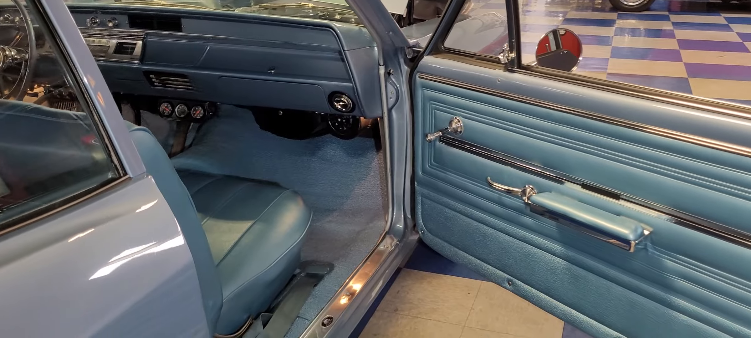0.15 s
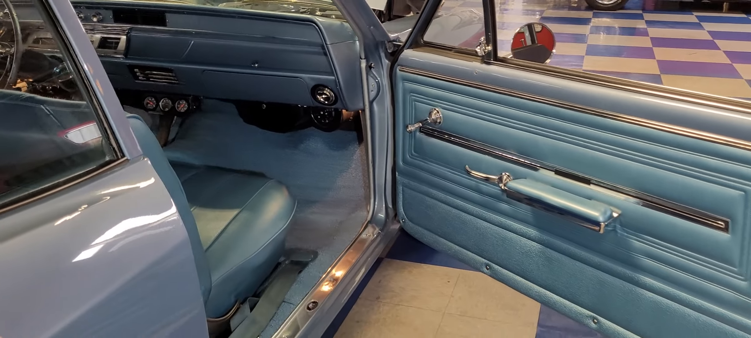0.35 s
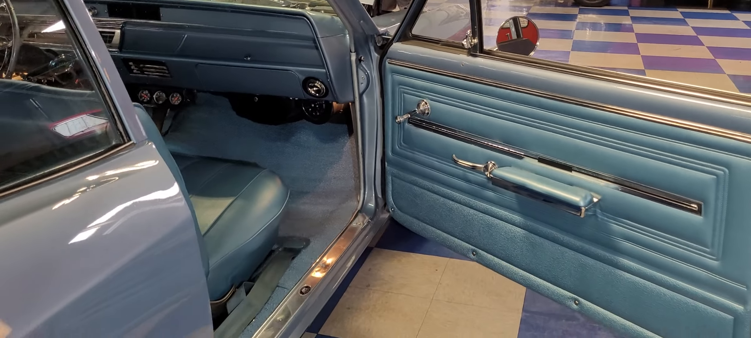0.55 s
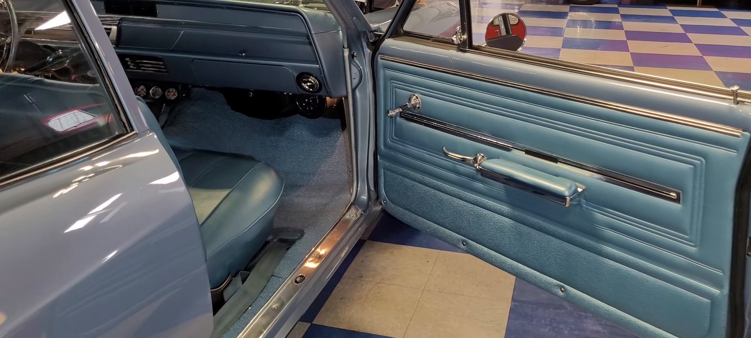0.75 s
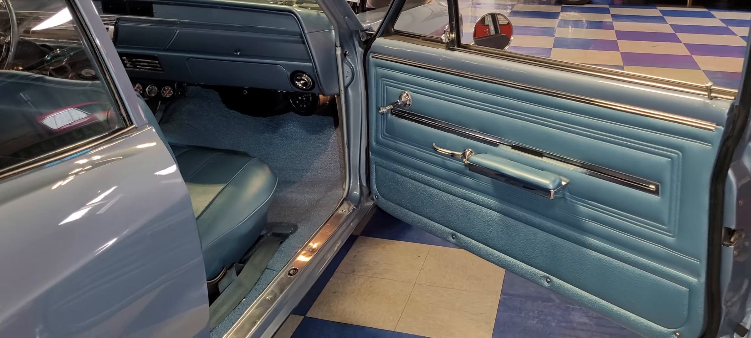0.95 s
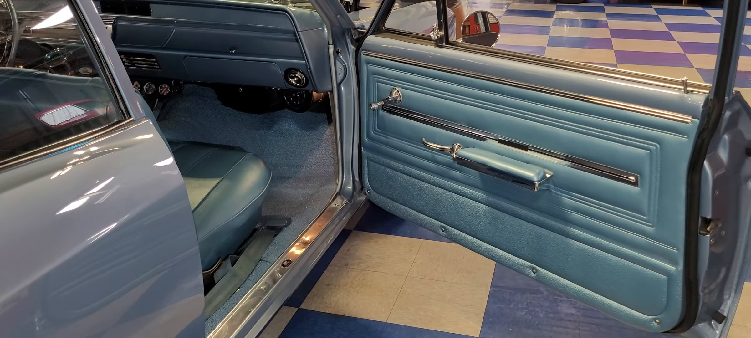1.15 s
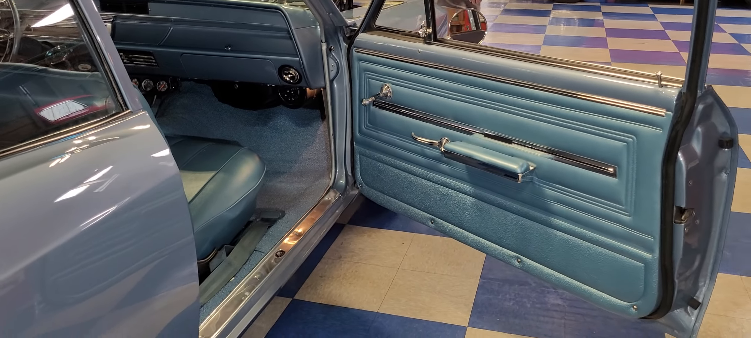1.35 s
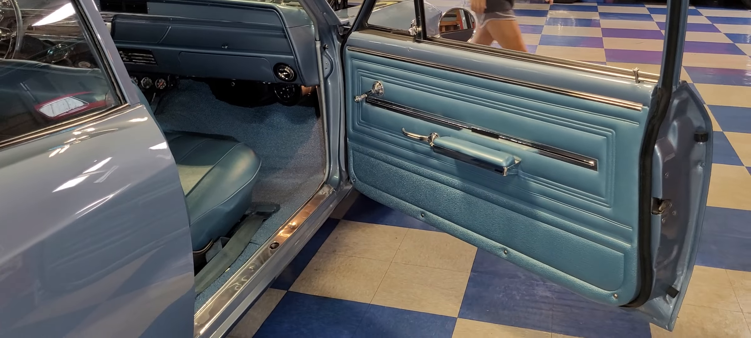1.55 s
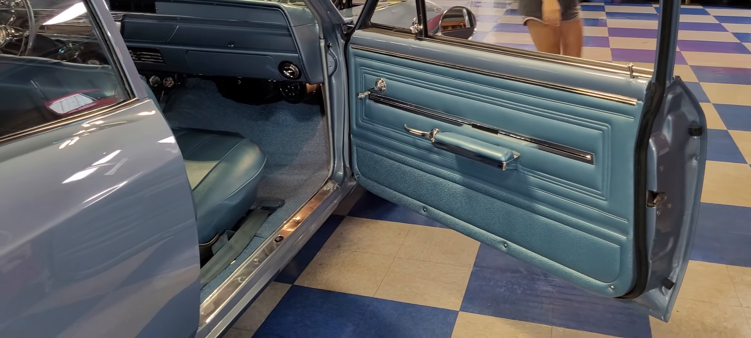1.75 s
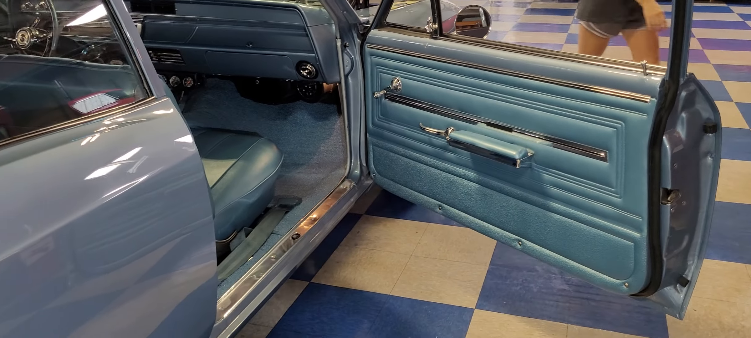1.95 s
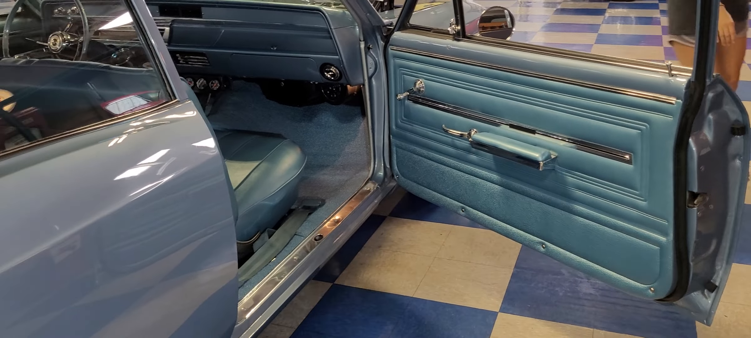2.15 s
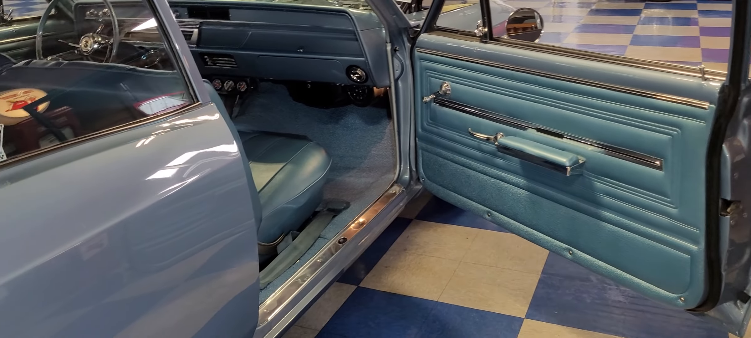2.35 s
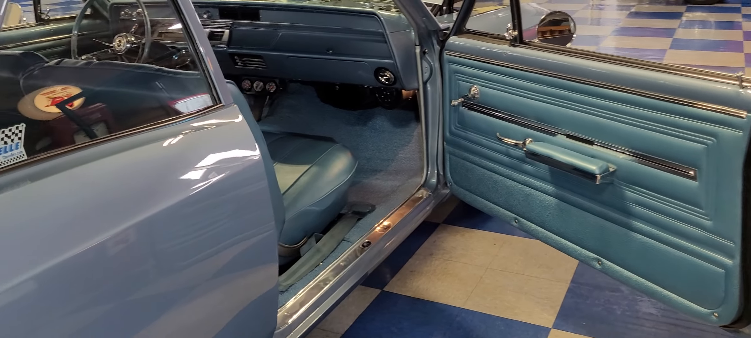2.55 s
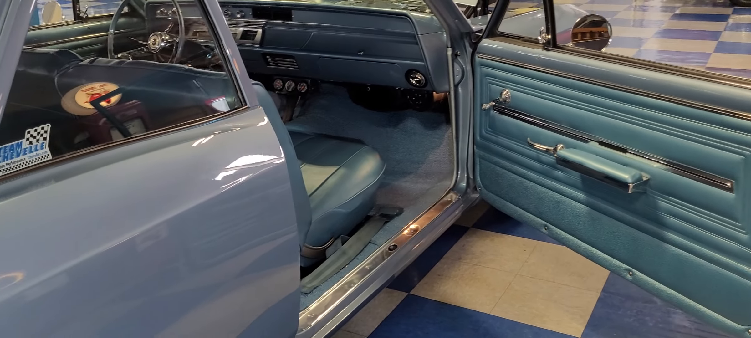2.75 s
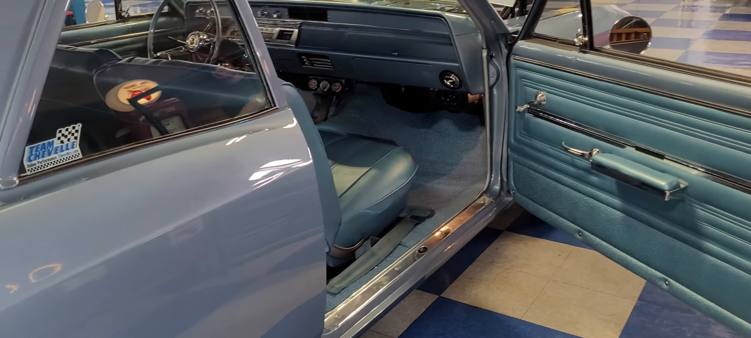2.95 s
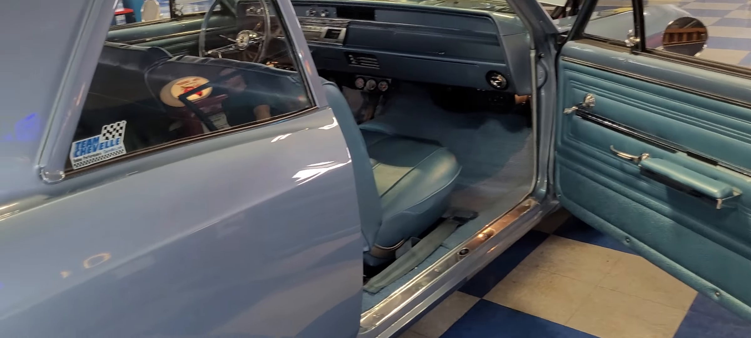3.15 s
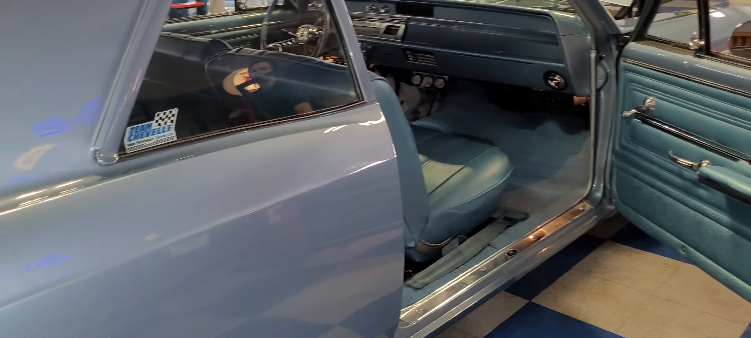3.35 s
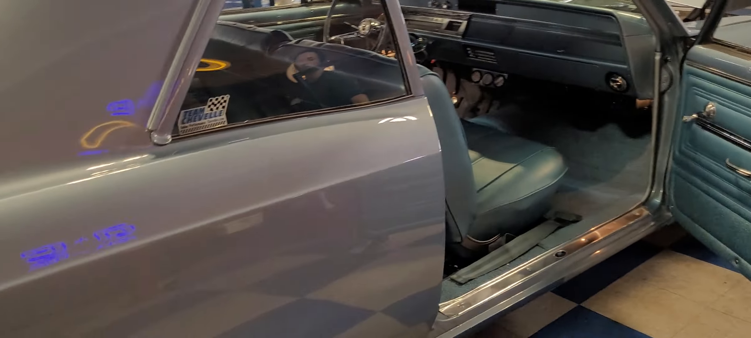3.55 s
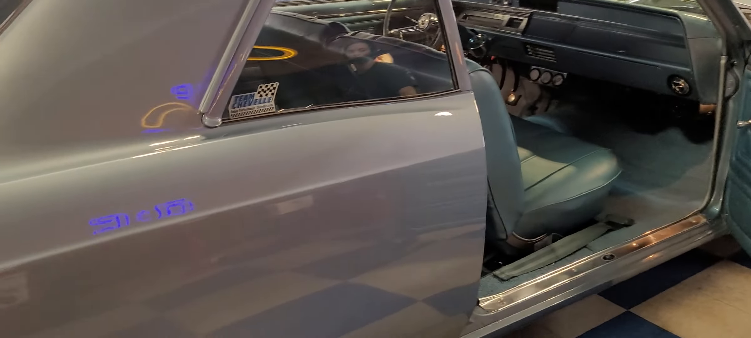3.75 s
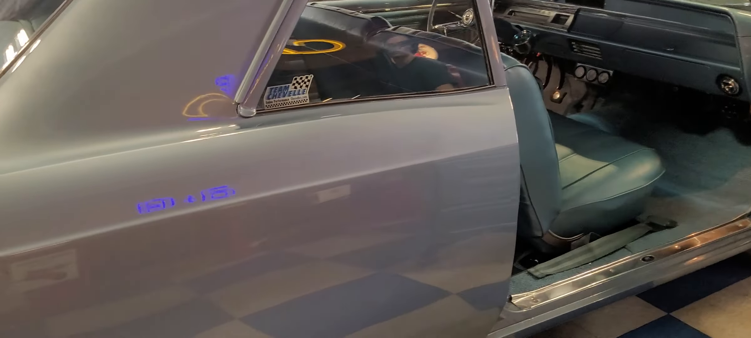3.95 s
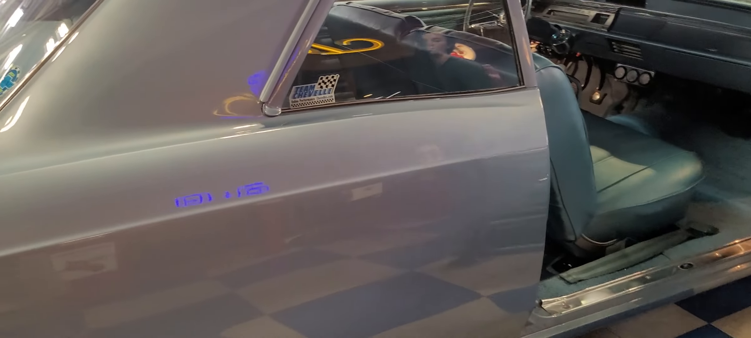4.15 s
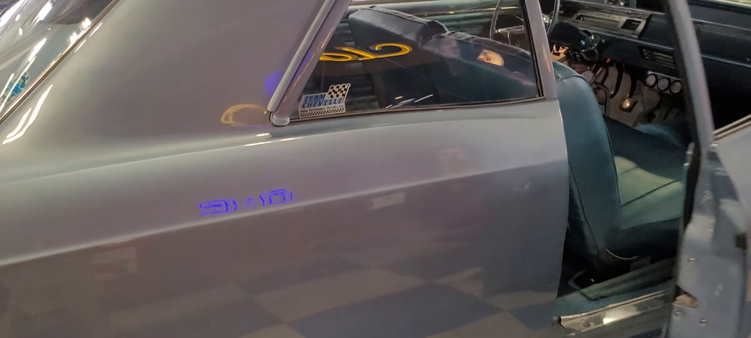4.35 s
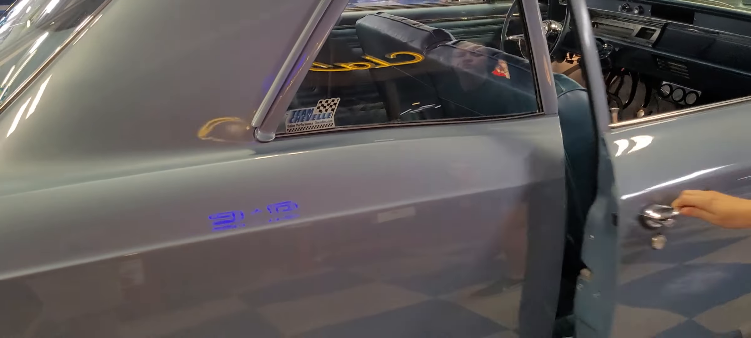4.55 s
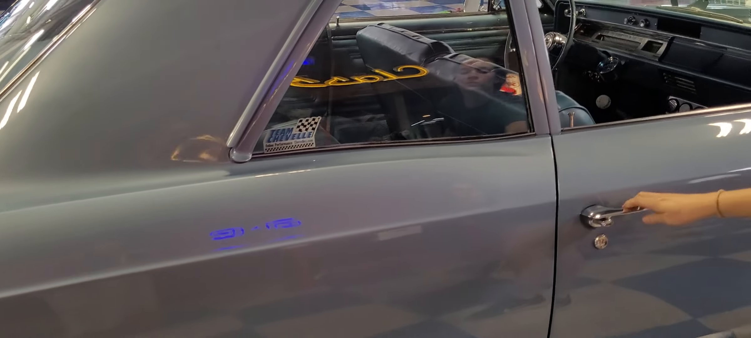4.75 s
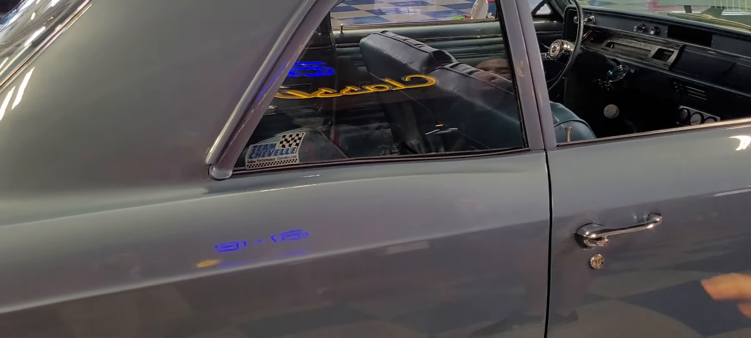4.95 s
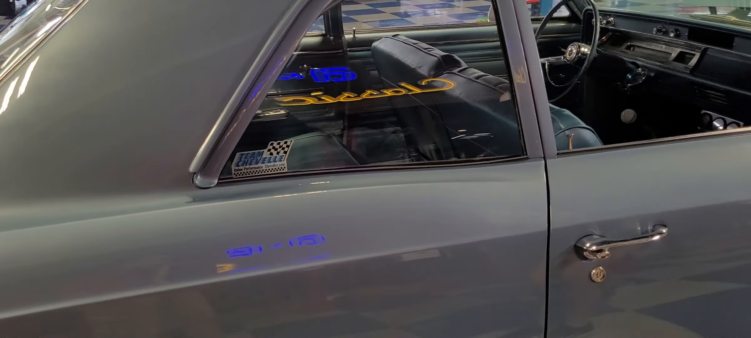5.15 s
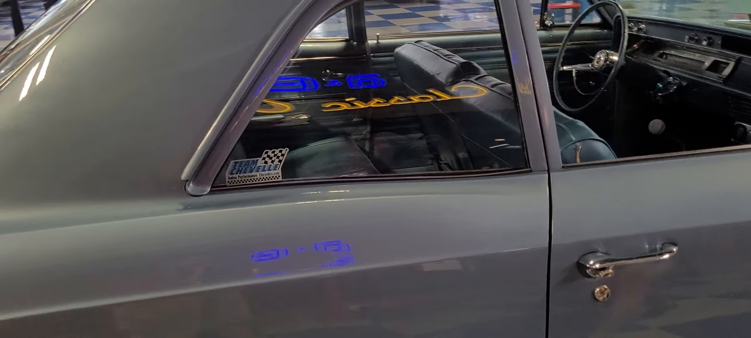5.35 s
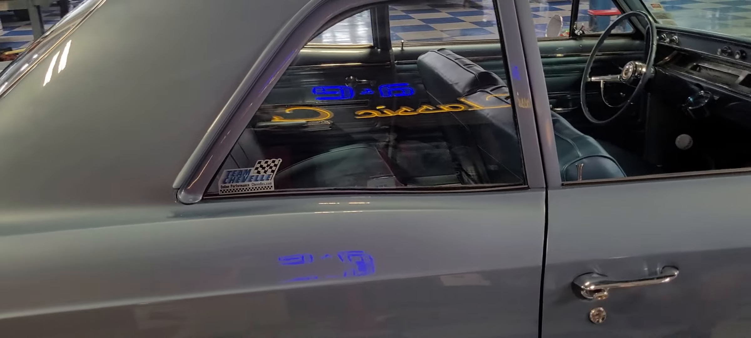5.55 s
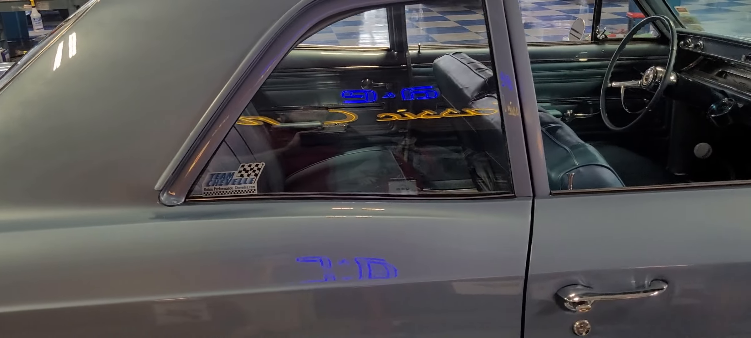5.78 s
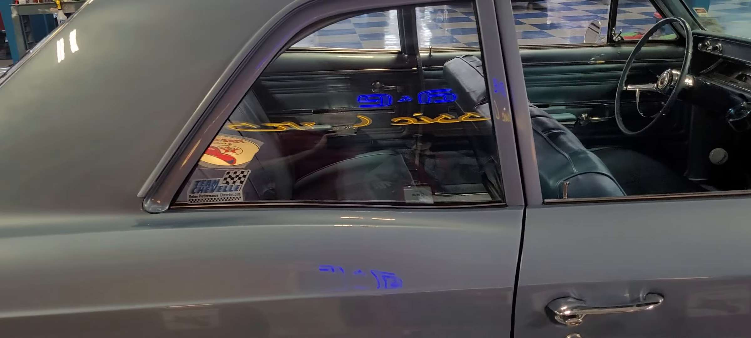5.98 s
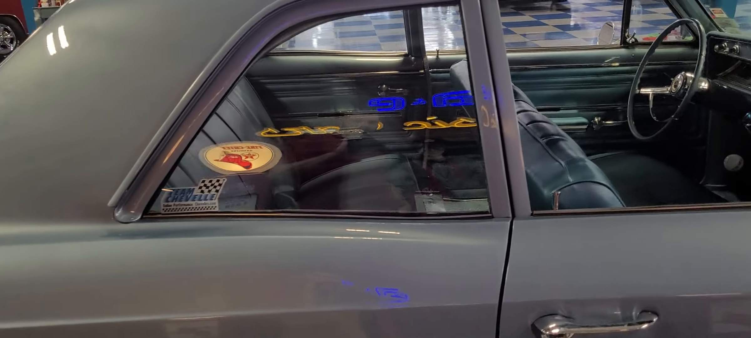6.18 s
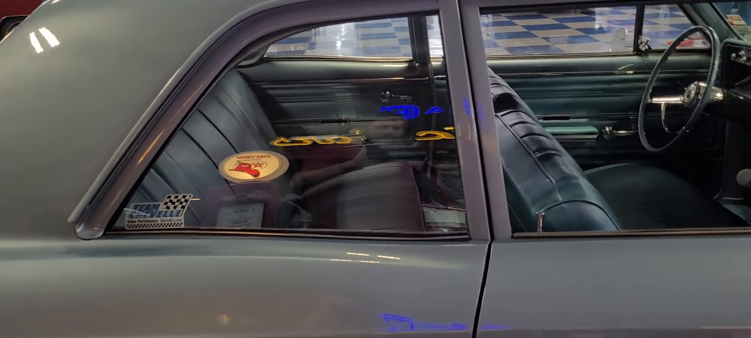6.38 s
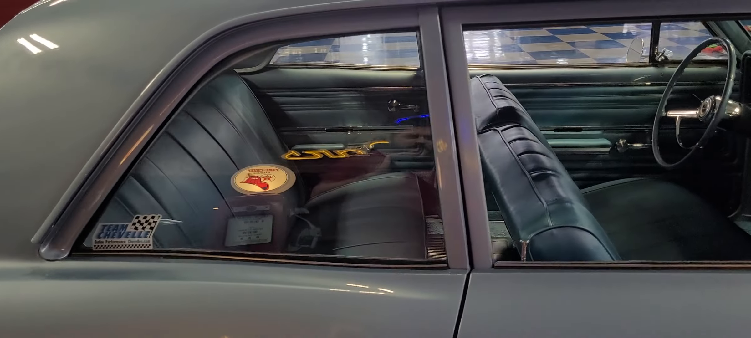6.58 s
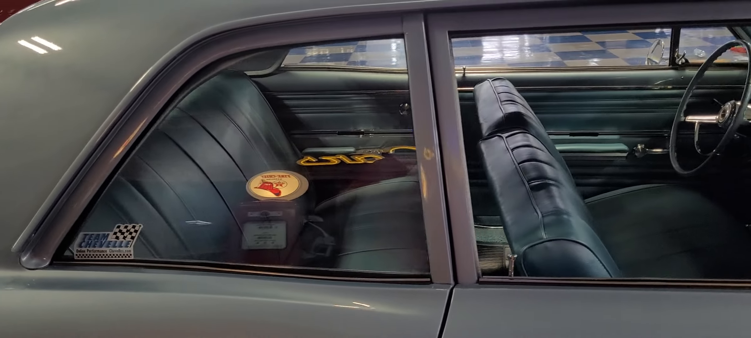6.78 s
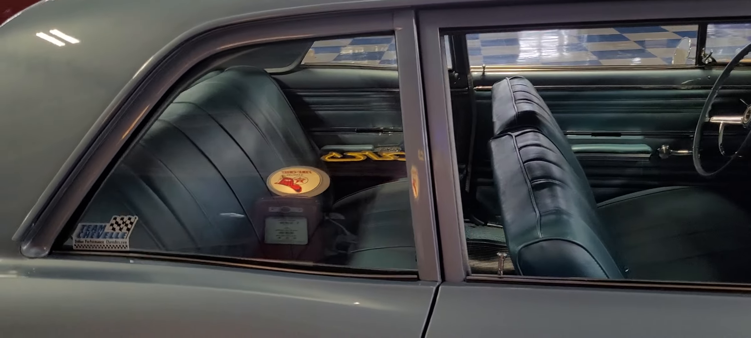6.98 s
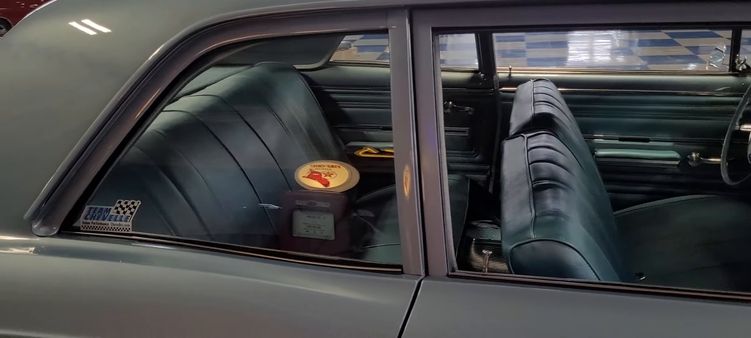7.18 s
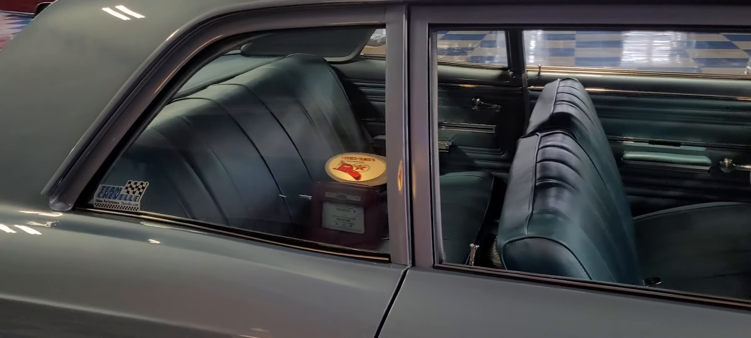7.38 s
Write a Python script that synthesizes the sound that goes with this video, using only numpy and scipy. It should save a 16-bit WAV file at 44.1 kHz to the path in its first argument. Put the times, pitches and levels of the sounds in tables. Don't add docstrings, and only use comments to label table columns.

```python
import sys
import numpy as np
from scipy import signal
from scipy.fft import rfft, irfft, next_fast_len
from scipy.io import wavfile
from scipy.ndimage import map_coordinates

SR = 44100
rng = np.random.default_rng(int(sys.argv[2]) if len(sys.argv) > 2 else 0)


def how_loud(loudness_db):
    steps = np.asarray(loudness_db, float) / 20
    return 10 ** steps


def store_pcm(level_fs):
    pcm = np.round(np.clip(level_fs, -1, 1) * 32767).astype(np.int16)
    wavfile.write(sys.argv[1], SR, np.atleast_2d(pcm).T)


N = 327129

# frequency_hz, density_db
RUMBLE_SPECTRUM = [(15, -49), (25, -26.5), (46, -6.5), (70, 0), (85, -2.5), (100, -9), (140, -11),
                   (170, -15.5), (220, -44), (370, -120)]
# frequency_hz, density_db
RUSH_SPECTRUM = [(100, -15.5), (170, -1), (194, -7.5), (248, -3), (282, -6.5), (317, -7), (398, -17.5),
                 (552, -15.5), (1080, -28), (2450, -31.5), (4640, -36), (6440, -35.5), (8500, -55),
                 (11000, -81), (18700, -120)]
# frequency_hz, density_db
HISS_SPECTRUM = [(4940, -64), (8000, -38), (8700, -33), (11800, -13.5), (13800, -14.5), (14400, -9),
                 (15000, 1), (15300, -5.5), (15740, -7.5), (15800, -35.5)]
# centre_hz, width_hz
DUCT_RESONANCES = [
    (543, 5),
    (2550, 200),
    (694, 5),
    (480, 6),
]
# frequency_hz, likeness (-1 to 1)
DIFFUSE_LIKENESS = [(60, 0.91), (180, 0.98), (550, 0.54), (1650, -0.3), (4970, 0.0056), (15000, -0.087)]
# frequency_hz, left_minus_right_db
BACKGROUND_BALANCE = [(60, -1.5), (180, -0.5), (550, -3.0), (1650, -4), (4970, 0.5), (15000, 5.5)]
# time_s, level_db
FLOW_LEVEL = [(0.0, -1.5), (0.39, 0.5), (.85, -0.5), (1.05, -4), (1.4, 2), (1.9, -0.5), (2.3, -0.5),
              (2.75, 1), (3.0, 1), (3.5, 3.5), (3.7, -2.5), (4.17, 3), (4.55, 0.5), (4.87, 8), (5.23, -1.5),
              (6.49, 0), (7.17, 1), (7.42, 5.5)]
# centre_s, half_width_s, level_db
DUCT_BEAMS = [(1.9, 0.64, -61.5), (3.0, 0.97, -73), (4.3, 0.51, -59.5), (7.4, 0.6, -61)]
# time_s, level_db
FAR_FAN_LEVEL = [(0, -75), (5.9, -72), (6.5, -53.5), (7.0, -52.5), (7.42, -49.5)]
# centre_hz, width_hz, level_db
FAR_FAN_TONES = [(228, 40, -0.5), (324, 60, -0.5)]
# frequency_hz, rms_db
BALLAST_LINES = [(14783, -81), (14847, -78), (14906, -81), (14966, -79), (15014, -79), (15084, -80),
                 (15149, -80), (15563, -88)]
# frequency_hz, t60_s
HALL_DECAY = [(60, 1.2), (250, 1.1), (800, 0.65), (3000, 1.33), (6000, 1.27), (9000, 1.24), (12000, 0.74)]
# frequency_hz, level_db
HALL_COLOUR = [(40, -8), (120, -8), (250, -5), (1000, -3.5), (5000, 2), (9000, -4), (15000, -2)]
# frequency_hz, level_db
PORT_RESPONSE = [(1500, 3.5), (3000, -1.5), (5800, 1.5), (7300, -1.5), (8500, -25), (10000, -10),
                 (12000, -6), (15000, -4), (16500, -7)]
# frequency_hz, likeness (-1 to 1)
NEAR_LIKENESS = [(60, 0.93), (180, 1), (550, 0.85), (1650, 0.077), (4970, 0.0034), (15000, 0.08)]
# frequency_hz, likeness (-1 to 1)
SNAP_LIKENESS = [(500, 0.46), (5000, 0.6), (15000, 0.28)]
# frequency_hz, left_minus_right_db
BODY_SHADOW = [(60, -3.5), (150, -0.5), (380, -2.5), (950, -1.5), (2380, 1), (5980, 6.5), (15000, 11.5)]
# peak_s, length_s, level_db, contact (0 instep, 1 heel, 2 toe)
SOLE_DRAGS = [(.406, 0.11, -55.5, 0.26), (1.1, 0.086, -61, 0.42), (1.19, 0.11, -63.5, 1),
              (1.67, 0.21, -59.5, .6), (2.29, 0.13, -69, 2), (2.51, 0.15, -56, 0.49), (2.77, 0.2, -59, .2),
              (2.9, 0.12, -74, 0.18), (3.116, 0.089, -60, 1.6), (3.29, 0.087, -76, .5),
              (3.89, 0.065, -58, 1), (1.47, .1, -64, .3), (4.17, 0.14, -55.5, .4), (4.256, 0.12, -55, 1.45),
              (4.44, 0.13, -56.5, 0.11), (5.32, .2, -60.5, 0.85), (5.61, 0.13, -64, 2),
              (5.94, 0.1, -51.5, 1.2), (6.3, 0.3, -61, 1.1), (6.534, 0.11, -58, 0.12),
              (6.66, 0.16, -57, 1.5), (6.97, 0.07, -56, 0.37), (7.17, 0.19, -54.5, 0.45),
              (7.27, 0.16, -50.5, 0.42), (7.39, 0.18, -59.5, 1.2)]
# peak_s, length_s, level_db, contact (0
SOLE_SCUFFS = [(3.023, 0.076, -56.5, 0.23), (3.542, 0.0087, -43.5, 1.6), (3.572, 0.17, -54, 0.66),
               (3.668, 0.071, -48.5, 0.56), (4.033, 0.11, -52.5, 1.8), (4.1, 0.056, -47.5, 0.093),
               (6.19, .05, -61.5, 2), (6.472, 0.038, -51.5, 1.64), (6.745, 0.081, -54.5, 1.7),
               (6.885, 0.14, -49, 1.55)]
# peak_s, length_s,
# level_db
CLOTH_RUBS = [(0.364, 0.043, -77), (2.3, .1, -72), (2.458, 0.21, -67.5), (2.825, 0.23, -66),
              (3.09, 0.21, -66), (3.266, 0.13, -68), (3.543, 0.011, -49), (3.586, 0.043, -64),
              (4.036, .02, -56), (4.086, 0.12, -59), (4.237, 0.16, -60.5), (5.607, .06, -76),
              (5.937, .16, -66.5), (6.465, 0.14, -57), (6.71, 0.13, -67), (6.91, .2, -73),
              (7.264, 0.83, -69.5)]
# centre_hz, width_hz, level_db
RUBBED_PARTS = [
    [(730, 650, 2.5), (1500, 610, -5)],
    [(2430, 1430, 0)],
    [(4520, 2000, 2), (6770, 1750, -4.5)],
    [(11500, 10000, 0)],
]
# start_s, level_db, pitch_hz
PART_TAPS = [(.357, -55, 6200), (.357, -58, 11500), (3.022, -52, 5600), (3.025, -52, 1500),
             (4.055, -50, 850), (4.09, -40.5, 190), (4.096, -42.5, 340), (4.098, -50, 1700),
             (4.109, -45.5, 950), (4.112, -41, 200), (5.976, -50, 2300), (5.996, -52, 2300),
             (3.125, -43.5, 5800), (3.515, -52, 3420), (3.541, -43, 2620), (3.541, -42, 5000),
             (4.030, -38.5, 840), (4.063, -40, 6200), (4.083, -40, 6300), (4.092, -43, 11500),
             (4.099, -37, 684), (4.030, -48, 1040), (4.098, -42, 6000), (4.104, -45, 11500),
             (4.106, -45.5, 1350), (4.115, -35, 660), (4.131, -35, 650), (4.161, -47.5, 4970),
             (4.202, -54, 11500), (4.235, -48.5, 5780), (5.824, -52, 5500), (5.953, -40, 2380),
             (6.466, -47.5, 1510), (6.53, -45, 790)]
# start_s, level_db, pitch_hz
RUBBER_CHAFES = [(.388, -51, 2260), (5.85, -53, 2940), (5.872, -50, 2800), (5.914, -44, 2720),
                 (5.927, -49, 5340), (5.94, -47, 2850), (5.995, -54, 4900), (6.514, -51, 1620),
                 (6.741, -44, 4300), (6.762, -45, 2530), (6.915, -45, 4500), (6.955, -49, 2450),
                 (6.94, -47, 4300), (7.124, -55, 1270), (7.262, -52, 2220), (7.377, -53, 1850),
                 (5.953, -46, 1327), (6.412, -46, 4100), (6.742, -42, 2790), (6.874, -45, 2370),
                 (6.889, -47, 2500), (6.93, -47, 2450), (6.885, -51, 4360), (7.235, -47, 1500),
                 (7.31, -45, 1800)]
# start_s, peak_db, knock_db, bright_db, left_minus_right_db
DRY_CLICKS = [(0.5033, -43, 2.5, 12, 11), (0.7482, -47, -16, 12, 18), (2.33, -48, -14, -18, -16),
              (2.5046, -49.5, 13.5, -14, 0.5), (3.022, -46.5, 3, -15, 4), (3.423, -39, -14, -5, 4),
              (3.5272, -43, 1, -12.5, 7), (3.6645, -49, -17, -35, 0), (4.03, -35, -8.5, -3.5, 7.5),
              (4.2354, -50, -12, -13.5, 3), (5.7605, -49, -12, -4, 2.5), (6.4636, -35.5, -21, 1, 8),
              (.357, -55, -20, 8, 12), (.382, -60, -20, 8, 10)]
# start_s, level_db
KEY_TOUCHES = [
    (5.7607, -50),
    (6.87, -65),
]
# frequency_hz, level_db, t60_s
KEY_PAIR = [(13535, 0, .15), (13563, -3, .13)]
# start_s, level_db, left_minus_right_db, scrape_db, push_to_crack_s
CATCH_SNAPS = [
    (3.4175, -13, -18, -15, .0001),
    (3.5643, -18, -14.5, 0.5, .0004),
]
# frequency_hz, density_db
CATCH_SPECTRA = [
    [(120, -8), (500, 0.5), (987, -1), (2240, -13), (3190, -4), (3800, -22.5), (4450, -8.5), (5000, -16),
     (5400, -1.5), (5900, -1.5), (6350, -14), (6870, -8.5), (8200, -43), (10000, -21), (12000, -29),
     (14000, -13), (16500, -39)],
    [(120, -10), (500, 7.5), (1800, -7), (2600, -6), (3500, -12.5), (4600, -9.5), (6140, -20),
     (6780, -10.5), (8200, -25), (10500, -28), (11500, -16), (13500, -12), (15200, -15), (16500, -32.5)],
]
# start_s, pitch_hz, peak_db, time_to_peak_s
DOOR_HEAVES = [(4.717, 56.5, -10, .026), (4.813, 63, -22, .018), (4.855, 71, -21, .03),
               (4.7125, 125, -9.5, .01), (4.7404, 113, -12, .016), (4.815, 130, -23, .02),
               (4.719, 241.6, -12, 0.0054), (4.738, 247, -14, 0.013), (4.775, 247, -17.5, 0.01),
               (4.7385, 360, -18.5, .004), (4.715, 600, -18.5, 0.0046), (4.7395, 612, -15.5, .004),
               (4.6915, 700, -11.5, 0.0075), (4.690, 835, -18, 0.0059), (4.713, 1850, -19.5, .004)]
# start_s, ring_db, crack_db, crack_t60_s
LATCH_CONTACTS = [
    (4.682, -45.5, -42.5, 0.08),
    (4.689, -9, -26, 0.03),
    (4.694, -8, -17, 0.036),
    (4.706, -40, -32, .03),
    (4.712, -21, -12.5, 0.038),
    (4.720, -22, -25.5, 0.26),
    (4.742, -19.5, -28, 0.073),
]
# frequency_hz, level_db, t60_s
STRIKER_MODES = [(488, -16, 0.032), (549, -7, 0.063), (703, -0.5, 0.06), (840, -5, 0.057),
                 (1003, -7.5, 0.044), (1085, -4, 0.05), (1368, -8.5, 0.024), (1786, -5, 0.024),
                 (4080, -28, 0.049), (5340, -23, .04)]
# start_s, ring_db, puff_db
SEAL_LANDINGS = [
    (4.718, -10.5, -30),
    (4.7528, -20.5, -27.5),
    (4.86, -25, -35.5),
]
# frequency_hz, level_db, t60_s
PANEL_MODES = [(178, -9.5, 0.15), (348, -17, 0.12), (390, -14.5, .15), (590, -23, 0.095), (624, -29, 0.148),
               (660, -19.5, 0.17), (800, -29, 0.13), (980, -25, 0.11), (1410, -23, 0.09)]
# start_s, level_db, t60_s
LOOSE_RATTLES = [
    (4.689, -11.5, 0.046),
    (4.713, -13, 0.28),
]
# frequency_hz, density_db
STEEL_SPECTRUM = [(180, -33), (300, 0), (486, -10.5), (603, -2.5), (749, -11), (1010, -9), (1170, -17),
                  (1390, -7.5), (1530, -13), (1810, -11), (3350, -23), (6000, -20), (8640, -35),
                  (11900, -25), (16000, -30)]

RUMBLE_DB, RUSH_DB, HISS_DB = -39.5, -47, -62.5
RUSH_FOLLOWS = 0.39
DUCT_REST_DB = -74.5
DIP_START_S, DIP_DB, DIP_FALL_S, DIP_HOLD_S, DIP_RELEASE_S = 4.64, -3, 0.14, 0.92, 0.74
DRAG_RISE, SCUFF_RISE = 0.38, 0.17
RUB_ENDS_DB, AWAY_DB = -11, -9.5
ROUNDNESS = 1.1
TAP_T60_AT_1K_S, TAP_DAMPING = 0.04, 0.6
CHAFE_LASTS, CHAFE_CLEAR, CHAFE_RISE_S = 3.9, 0.49, 0.0045
CLICK_T60_S = 0.011
PUSH_HZ = 1800
HEAVE_SHARPNESS = 1.5
RATTLE_RISE_S, BRIGHT_DB, BRIGHT_LASTS = 0.003, -9, 1.6
TOP_HZ = 15950


def unit(x):
    return x / np.sqrt(np.mean(x ** 2) + 1e-20)


def along(points, hz):
    f, v = np.transpose(points)
    return np.interp(np.log(hz + 1), np.log(f + 1), v)


def curves(rows):
    s, *cols = np.transpose(rows)
    return [np.interp(np.arange(N) / SR, s, c) for c in cols]


def wobble(rate_hz):
    knots = rng.standard_normal(N // 128)
    return map_coordinates(knots, [np.arange(N) * min(rate_hz, 300) / SR])


def filtered(x, response):
    m = next_fast_len(x.shape[-1] + 8192)
    spectrum = rfft(x, m) * response(np.fft.rfftfreq(m, 1 / SR))
    return irfft(spectrum, m)[..., :x.shape[-1]]


def band(hz, lo_hz, hi_hz):
    return 1 / np.sqrt((1 + (lo_hz / (hz + 1)) ** 8) * (1 + (hz / hi_hz) ** 8))


def resonances(modes, hz):
    return sum(how_loud(db) / (1 + (2 * (hz - c) / w) ** 2) for c, w, db in modes)


def rush(gain, likeness, size=None):
    def mid_side_gain(hz):
        turn = np.arccos(np.clip(along(likeness, hz), -1, 1)) / 2
        return gain(hz) * [np.cos(turn), np.sin(turn)]

    mid, side = filtered(rng.standard_normal((2, size or N)), mid_side_gain)
    return unit(np.array([mid + side, mid - side]))


def sides(db):
    return how_loud(np.array([db / 2, -db / 2]))


def add(into, s, x):
    part = into[..., round(s * SR):][..., :x.shape[-1]]
    part += x[..., :part.shape[-1]]


def ring(modes, t, attack_s, scatter_db):
    tones = 0
    for hz, db, t60 in modes:
        level = how_loud(db + rng.normal(0, scatter_db) - 60 * t / t60)
        tones = tones + level * np.sin(2 * np.pi * hz * t)
    return tones * (1 - np.exp(-t / attack_s))


def whine():
    t, drift = np.arange(N) / SR, 0.6 * wobble(8)
    starts = 2 * np.pi * rng.random((len(BALLAST_LINES), 2, 1))
    lines = sum(how_loud(db) * np.sin(2 * np.pi * hz * t + drift + start)
                for (hz, db), start in zip(BALLAST_LINES, starts))
    return np.sqrt(2) * how_loud(1.2 * wobble(5)) * lines


def ducts():
    low, high, mate, under = (rush(lambda hz: resonances([(c, w, 0)], hz), DIFFUSE_LIKENESS)
                              for c, w in DUCT_RESONANCES)
    t = np.arange(N) / SR
    beam = how_loud(DUCT_REST_DB) + sum(how_loud(db) * np.exp(-((t - s) / width) ** 2) for s, width, db in DUCT_BEAMS)
    return beam * (low + how_loud(-5) * mate + how_loud(-5.5) * under) + how_loud(-71.5 + 1.9 * wobble(2.3)) * high


def air():
    flow_db, = curves(FLOW_LEVEL)
    rumble_level = how_loud(RUMBLE_DB + flow_db + 0.6 * wobble(2.8) + 1.4 * wobble(9))
    rumble = rumble_level * rush(lambda hz: how_loud(along(RUMBLE_SPECTRUM, hz)), DIFFUSE_LIKENESS)
    body_level = how_loud(RUSH_DB + RUSH_FOLLOWS * flow_db + 0.53 * wobble(2.5))
    body = body_level * rush(lambda hz: how_loud(along(RUSH_SPECTRUM, hz)), DIFFUSE_LIKENESS)
    hiss = how_loud(HISS_DB) * rush(lambda hz: how_loud(along(HISS_SPECTRUM, hz)), DIFFUSE_LIKENESS)
    fan = how_loud(curves(FAR_FAN_LEVEL)[0]) * rush(lambda hz: resonances(FAR_FAN_TONES, hz), DIFFUSE_LIKENESS)
    dip_times = np.cumsum([DIP_START_S, DIP_FALL_S, DIP_HOLD_S, DIP_RELEASE_S])
    dip_db, = curves(np.transpose([dip_times, [0, DIP_DB, DIP_DB, 0]]))
    everything = rumble + body + fan + ducts() + hiss + whine()
    return how_loud(dip_db) * filtered(everything, lambda hz: sides(along(BACKGROUND_BALANCE, hz)))


def hall(x):
    noise = rush(np.ones_like, DIFFUSE_LIKENESS, size=SR * 3 // 2)
    hz, t, z = signal.stft(noise, SR, nperseg=512)
    decay_db = along(HALL_COLOUR, hz)[:, None] - 60 * t / along(HALL_DECAY, hz)[:, None]
    tail = signal.istft(z * how_loud(decay_db), SR, nperseg=512)[1]
    late = np.pad(tail / np.linalg.norm(tail[0]), ((0, 0), (round(0.008 * SR), 0)))
    return signal.fftconvolve(x.mean(axis=0)[None], late, axes=1)[:, :N]


def pressure(rubs):
    out, late = np.zeros((len(RUBBED_PARTS), N)), np.arange(-SR // 2, SR // 2) / SR
    for s, length, db, rise, shares in rubs:
        shape = np.maximum(-late / rise, late / (1 - rise)) / length
        near = np.flatnonzero((shape < 3) & (late > -s))
        add(out, s + late[near[0]], np.outer(shares, how_loud(db + RUB_ENDS_DB * shape[near] ** ROUNDNESS)))
    return out


def scuffs():
    rubs = []
    for rows, rise in ((SOLE_DRAGS, DRAG_RISE), (SOLE_SCUFFS, SCUFF_RISE)):
        for s, length, db, place in rows:
            shares = [*how_loud(AWAY_DB * np.abs(np.arange(3) - place)), 0]
            rubs.append((s, length, db, rise, shares))
    rubs += [(*row, DRAG_RISE, [0, 0, 0, 1]) for row in CLOTH_RUBS]
    cycle = np.cumsum(78 * how_loud(1.6 * wobble(25))) / SR % 1
    slips = (0.77 + np.exp(-cycle / 0.59)) * how_loud(0.6 * wobble(45) + 1.6 * wobble(260))
    noise = slips * rush(lambda hz: how_loud(0.58 * along(PORT_RESPONSE, hz)), NEAR_LIKENESS)
    out = np.zeros((2, N))
    for press, modes, trim_db in zip(pressure(rubs), RUBBED_PARTS, (-0.5, -1.0, 2.5, 3.0)):
        part = unit(filtered(noise, lambda hz: resonances(modes, hz)))
        out += press * how_loud(trim_db + 1.0 * wobble(40)) * part
    return sides(0.6)[:, None] * out


def taps():
    out, t = np.zeros((2, N)), np.arange(SR // 6) / SR
    kinds = ((PART_TAPS, 1, 1, 0.00052, 0.45), (RUBBER_CHAFES, CHAFE_LASTS, CHAFE_CLEAR, CHAFE_RISE_S, 0.9))
    for rows, lasts, clear, rise_s, grit in kinds:
        for s, db, hz in rows:
            t60 = lasts * TAP_T60_AT_1K_S * (1000 / hz) ** TAP_DAMPING
            rough = rush(lambda f: resonances([(hz, 0.25 * hz, 0)], f), SNAP_LIKENESS, size=len(t))
            tone = clear * np.sin(2 * np.pi * hz * t) + grit * rough
            envelope = how_loud(db - 60 * t / t60) * (1 - np.exp(-t / rise_s))
            add(out, s, sides(0.7 * along(BODY_SHADOW, hz))[:, None] * envelope * tone)
    return out


def clicks():
    out, t = np.zeros((2, N)), np.arange(SR // 40) / SR
    for s, db, knock_db, bright_db, lean_db in DRY_CLICKS:
        def tone(hz):
            edge = how_loud(bright_db + 11.0) * band(hz, 9300, 19000)
            return how_loud(along(PORT_RESPONSE, hz)) * (band(hz, 2000, 8450) + edge)

        crack = rush(tone, SNAP_LIKENESS, size=len(t)) * how_loud(-60 * t / CLICK_T60_S)
        knock = how_loud(knock_db + 10 - 60 * t / 0.0023) * np.sin(2 * np.pi * 650 * t)
        add(out, s, how_loud(db - 1.7) * sides(lean_db)[:, None] * (crack + knock))
    for s, db in KEY_TOUCHES:
        add(out, s, how_loud(db) * ring(KEY_PAIR, np.arange(SR // 4) / SR, 0.00056, scatter_db=0.7))
    return out


def snaps():
    size = 2048
    out, t = np.zeros((2, N)), np.arange(size) / SR
    fold = np.r_[1, np.full(size // 2 - 1, 2), np.zeros(size // 2)]
    hz = np.fft.rfftfreq(size, 1 / SR)
    low = 1 / (1 + (hz / PUSH_HZ) ** 2)
    for way, (s, db, lean_db, scrape_db, late), spectrum in zip((1, -1), CATCH_SNAPS, CATCH_SPECTRA):
        gain = how_loud(along(spectrum, hz))
        cepstrum = irfft(np.log(gain * (1 - low) + 1e-6))
        pulse = irfft(np.exp(rfft(cepstrum * fold)))
        push = np.roll(irfft(gain * low), size // 2)
        scrape = how_loud(scrape_db - 9.5 - 60 * t / 0.008) * rng.standard_normal((2, size))
        crack = way * pulse + signal.fftconvolve(scrape, pulse[None], axes=1)[:, :size]
        level = how_loud(db) * sides(lean_db)[:, None] / (push.max() + np.abs(pulse).max())
        add(out, s - size / 2 / SR, level * way * push)
        add(out, s + late, level * crack)
    return out


def heaves():
    out, t = np.zeros(N), np.arange(SR // 2) / SR
    for s, hz, db, swell in DOOR_HEAVES:
        envelope = (t / swell * np.exp(1 - t / swell)) ** HEAVE_SHARPNESS
        add(out, s, -how_loud(db) * envelope * np.sin(2 * np.pi * hz * t))
    return out


def latch():
    rings, crack, t = np.zeros(N), np.zeros(N), np.arange(SR // 2) / SR
    for s, ring_db, crack_db, t60 in LATCH_CONTACTS:
        add(rings, s, how_loud(ring_db) * ring(STRIKER_MODES, t, 0.0013, scatter_db=3.0))
        add(crack, s, how_loud(crack_db - 60 * t / t60))
    return rings, crack


def seal():
    out, t = np.zeros(N), np.arange(SR // 2) / SR
    puff = rush(lambda hz: band(hz, 60, 250), [(100, 0.71)])[0]
    for s, db, puff_db in SEAL_LANDINGS:
        envelope = how_loud(puff_db - 60 * t / 0.38) * (1 - np.exp(-t / 0.0037))
        add(out, s, envelope * puff[round(s * SR):][:len(t)])
        add(out, s, -how_loud(db) * ring(PANEL_MODES, t, 0.006, scatter_db=1.5))
    return out


def steel(crack):
    loose, t = np.zeros((2, N)), np.arange(SR // 2) / SR
    for s, db, t60 in LOOSE_RATTLES:
        both_t60 = t60 * np.array([[1], [BRIGHT_LASTS]])
        add(loose, s, how_loud(db - 60 * t / both_t60) * (1 - np.exp(-t / RATTLE_RISE_S)))
    bright = rush(lambda hz: how_loud(along(STEEL_SPECTRUM, hz)) * band(hz, 1660, 21000), NEAR_LIKENESS)
    dull = rush(lambda hz: how_loud(along(STEEL_SPECTRUM, hz)) * band(hz, 290, 1800), NEAR_LIKENESS)
    shake = how_loud(4.0 * wobble(200))
    bright_level = crack + shake * how_loud(BRIGHT_DB - 7.5) * loose[1]
    dull_level = 0.55 * crack + shake * how_loud(-4.5) * loose[0]
    return bright_level * bright + dull_level * dull


def door():
    rings, crack = latch()
    slam = heaves() + rings + seal() + steel(crack)
    return filtered(slam, lambda hz: sides(along(BODY_SHADOW, hz)))


def scene():
    slam, small = door(), clicks() + taps() + snaps()
    answer = hall(how_loud(-11.5) * slam + how_loud(-33.5) * small)
    return slam + small + answer + scuffs() + air()


def roll_off(x):
    return signal.sosfilt(signal.butter(12, 17140, fs=SR, output="sos"), x)


def record(dry):
    limited = filtered(dry, lambda hz: np.where(hz < TOP_HZ, 1, how_loud(-40)))
    rounded = limited / (1 + np.abs(limited / 0.99) ** 6) ** (1 / 6)
    return roll_off(rounded)


dry = scene()
out = record(dry)
store_pcm(out)
```